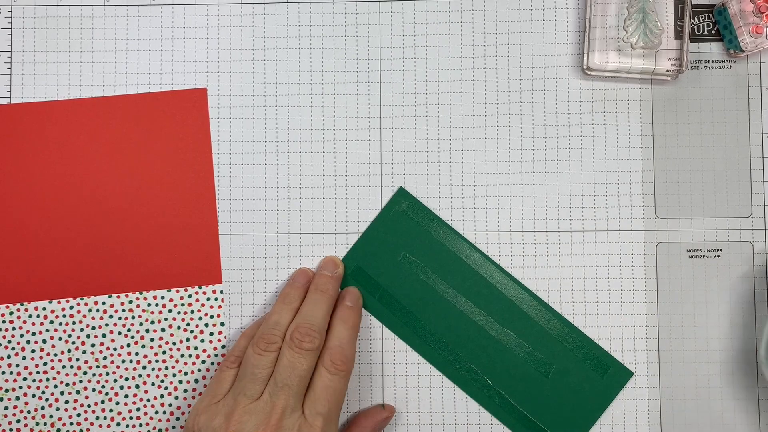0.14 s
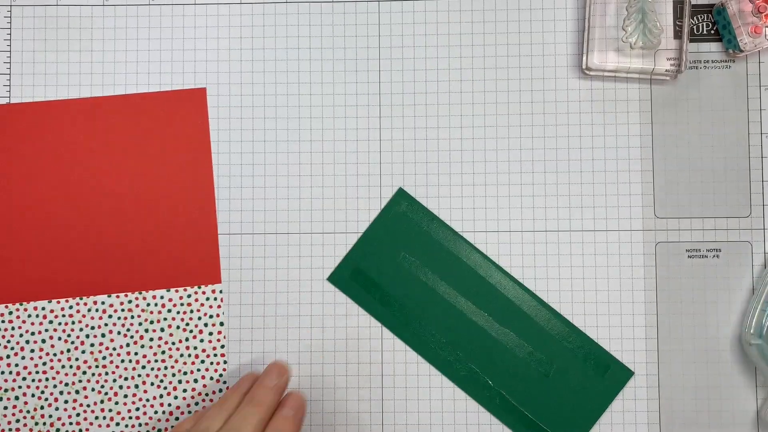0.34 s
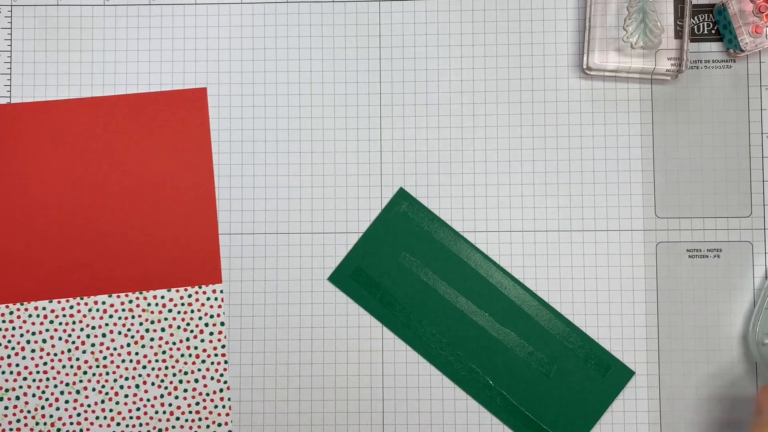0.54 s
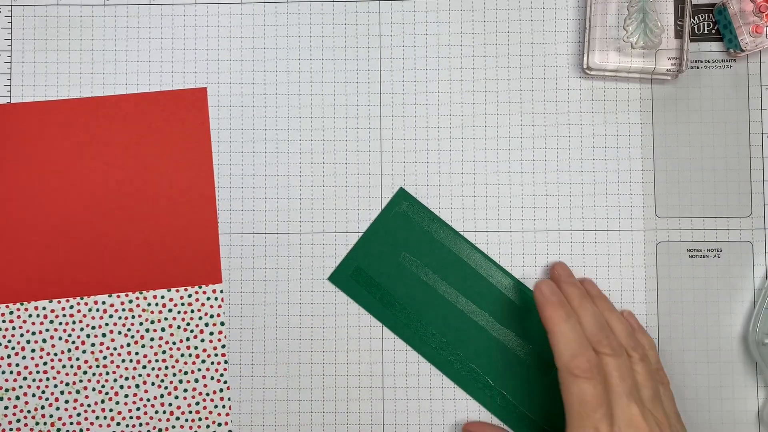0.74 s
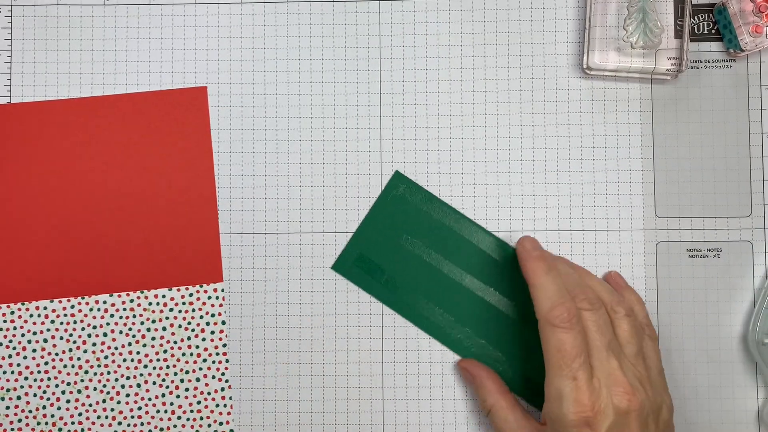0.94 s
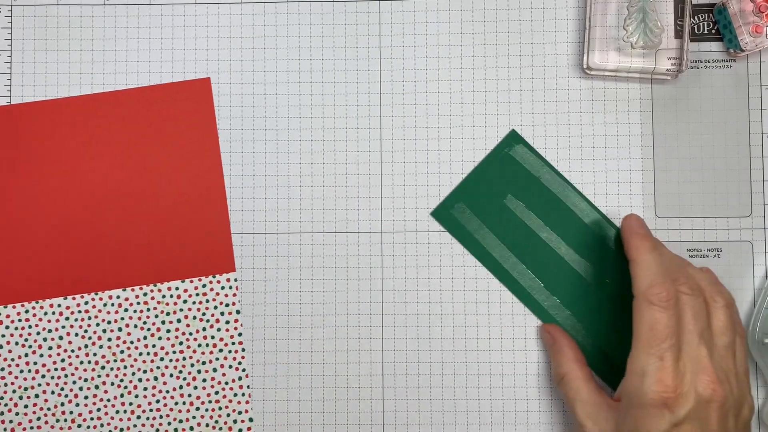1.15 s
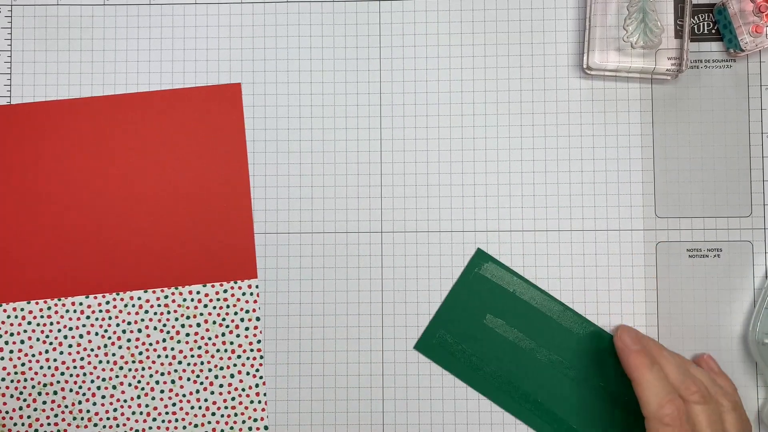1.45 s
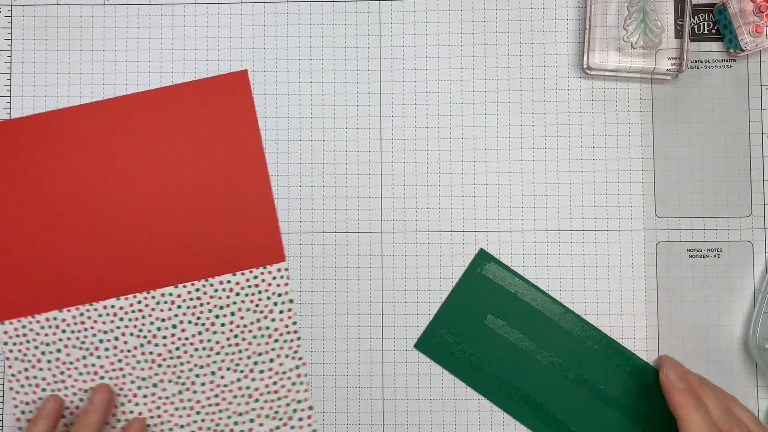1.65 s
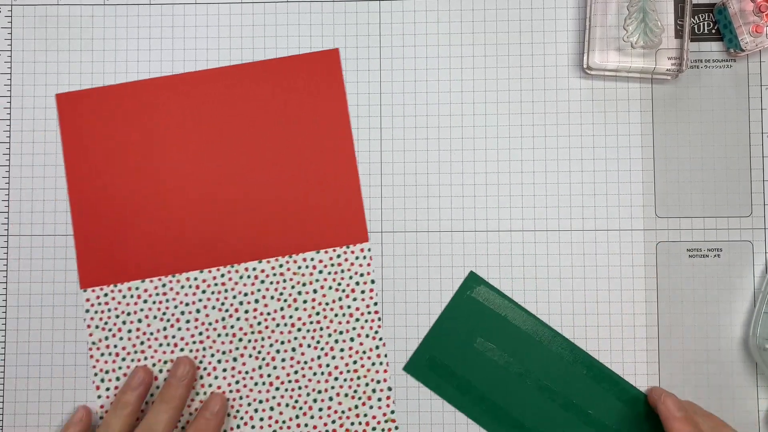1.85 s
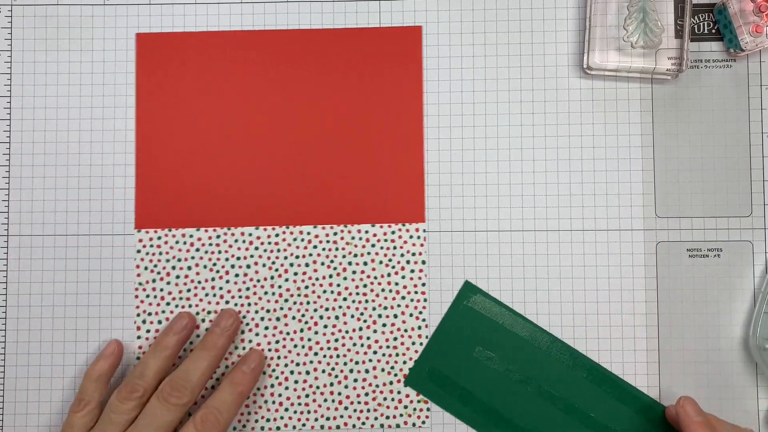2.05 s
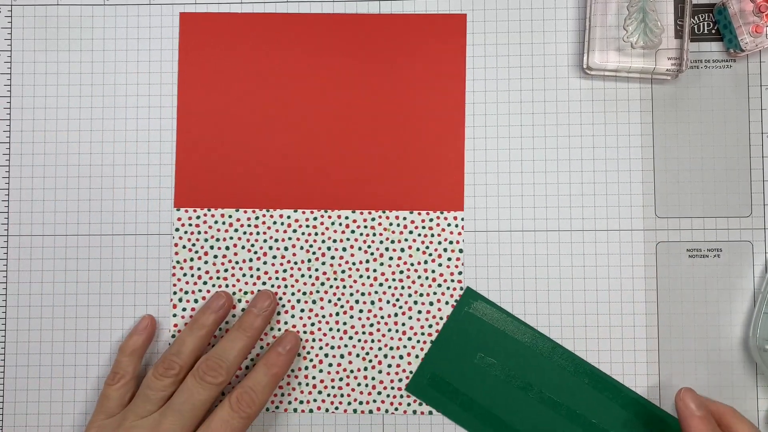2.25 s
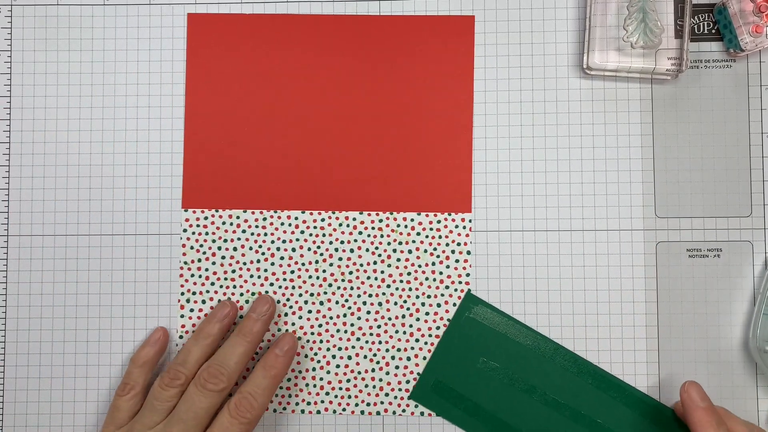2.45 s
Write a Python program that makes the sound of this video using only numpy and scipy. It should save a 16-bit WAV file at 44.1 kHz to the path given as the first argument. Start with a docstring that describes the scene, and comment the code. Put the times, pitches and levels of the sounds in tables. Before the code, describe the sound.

A plastic tape runner clatters onto a desk at about 0.2 and 0.4 seconds, slightly right, rattling over dull thuds and settling by 0.5. From 0.8 seconds, fingers pat softly and card brushes over a paper mat. Card edges snap crisply near 1.3 and 1.6 seconds. A longer, hissing slide follows until about 2.2, then faint rubs and a soft bump over low room tone.

```python
"""A plastic tape runner is put down on a craft desk and rattles to rest: each contact rings its shell
and shakes its loose parts, and the desk top thuds underneath. Then hands pat the desk and slide sheets
of card over a paper mat, a grainy hiss with a few crisp edge snaps. Behind it sit a faint rustle, low
room tone and a short reverb. In stereo the hits lean right, and everything arrives a little earlier
on the left."""
import sys
import numpy as np
from scipy import signal
from scipy.fft import rfft, irfft, next_fast_len
from scipy.io import wavfile
from scipy.ndimage import map_coordinates

SR = 44100
rng = np.random.default_rng(int(sys.argv[2]) if len(sys.argv) > 2 else 0)


def wrap_up_sound(samples):
    """Save the sound to the file named by the first command line argument, as 16-bit audio."""
    columns = np.atleast_2d(samples).T
    # keep every value between -1 and 1, then stretch to whole-number steps
    tamed = np.clip(columns, -1, 1)
    steps = np.round(tamed * 32767).astype(np.int16)
    wavfile.write(sys.argv[1], SR, steps)


N = 114660
SCENE_T = np.arange(N) / SR
HIT_T = np.arange(SR // 2) / SR  # seconds since a hit


def amp(db):
    """Decibels to gain."""
    return 10 ** (np.asarray(db) / 20)


def decay(t60):
    """A hit's envelope, falling 60 dB in t60 seconds."""
    return amp(-60 * HIT_T / t60)


def rise(attack_s):
    """A hit's attack, easing from 0 towards 1."""
    return 1 - np.exp(-HIT_T / attack_s)


def unit(x):
    """Scale to rms 1."""
    return x / np.sqrt(np.mean(x ** 2) + 1e-20)


def along(points, hz):
    """Read a curve of (freq_hz, value) points on a log frequency axis."""
    freqs, values = np.transpose(points)
    return np.interp(np.log(hz + 1), np.log(freqs + 1), values)


def filtered(x, response):
    """Filter x by a complex response, given as a function of frequency."""
    n = x.shape[-1]
    padded = next_fast_len(n + 8192)
    return irfft(rfft(x, padded) * response(np.fft.rfftfreq(padded, 1 / SR)), padded)[..., :n]


def noise(eq, size=len(HIT_T)):
    """Noise of rms 1, coloured by (freq_hz, gain_db) points; one hit long by default."""
    return unit(filtered(rng.standard_normal(size), lambda hz: amp(along(eq, hz))))


def wobble(rate_hz):
    """A smooth random curve with rate_hz knots a second."""
    knots = rng.standard_normal(int(N * rate_hz / SR) + 4)
    return map_coordinates(knots, [SCENE_T * rate_hz])


def ring(modes, attack_s, scatter_db):
    """Struck modes: damped sines whose levels vary from hit to hit by scatter_db."""
    partials = (amp(db + scatter_db * rng.standard_normal()) * decay(t60)
                * np.sin(2 * np.pi * hz * HIT_T) for hz, db, t60 in modes)
    return rise(attack_s) * sum(partials)


def place(track, start_s, sound):
    """Mix a sound into the track at start_s."""
    span = track[round(start_s * SR):][:len(sound)]
    span += sound[:len(span)]


def room_tone():
    """A low, gently wavering rumble, slightly different on each side."""
    eq = [(20, 5), (60, 4), (100, -0.5), (200, 0), (400, -15), (800, -29.5), (2000, -33), (16000, -63)]  # rumble colour: freq_hz, gain_db
    level = amp(-69 + 1.5 * wobble(11))
    return level * (noise(eq, N) + 0.24 * np.array([noise(eq, N), noise(eq, N)]))


def reverb(x):
    """The room's tail, longest in the bass: a centre layer plus a darker, diffuse one on each side."""
    decay_times = [(200, 0.64), (1000, 0.12), (4000, 0.15), (12000, 0.067)]  # room decay: freq_hz, t60_s
    hz, t, spectra = signal.stft(rng.standard_normal((3, SR // 3)), SR, nperseg=256)
    tails = signal.istft(spectra * amp(-60 * t / along(decay_times, hz)[:, None]), SR, nperseg=256)[1]
    tails /= np.linalg.norm(tails[0])
    predelayed = np.pad(x, (200, 0))
    centre, *sides = signal.fftconvolve(predelayed[None], tails, axes=1)[:, :N]
    diffuse = filtered(np.array(sides), lambda f: 1 / (1 + (f / 3000) ** 4))
    return amp(-10) * centre + amp(-3.5) * diffuse


def rustle(centre_hz=1800, width_hz=210):
    """A faint, narrow band of noise that swells twice and flutters."""
    fader = [(.56, -90), (.62, -64.5), (.68, -73.5), (0.759, -65.5), (.9, -75), (1.0, -88)]  # rustle envelope: time_s, level_db
    time_s, level_db = np.transpose(fader)
    band = filtered(rng.standard_normal(N), lambda hz: np.exp(-((hz - centre_hz) / width_hz) ** 2))
    return amp(np.interp(SCENE_T, time_s, level_db) + 2 * wobble(36)) * unit(band)


def card_slides():
    """Card rubbing on paper: a fine hiss and a duller scrape, grainy with the fibres."""
    strokes = [(0, -73, -63.5), (.055, -71.5, -74), (.075, -55.5, -59.5), (0.108, -49.5, -61),
               (.15, -68, -73.5), (.2, -67.5, -67), (.33, -69.5, -71.5), (0.382, -62.5, -59.5),
               (.52, -75, -79), (0.579, -75, -77.5), (.7, -78.5, -75.5), (0.762, -74.5, -72.5),
               (0.801, -55, -55.5), (0.849, -64.5, -63.5), (.9, -60.5, -57), (1.0, -52.5, -57),
               (1.04, -53.5, -60), (1.109, -48.5, -60), (1.15, -50, -59.5), (1.2, -61, -56.5),
               (1.25, -57.5, -62), (1.31, -51, -61), (1.412, -52, -65.5), (1.46, -65.5, -83.5),
               (1.489, -73, -86.5), (1.52, -64.5, -75), (1.55, -66.5, -79), (1.6, -70.5, -68.5),
               (1.625, -49.5, -66.5), (1.719, -41.5, -59), (1.78, -43, -63), (1.9, -42, -62),
               (2.01, -44, -61), (2.05, -43, -57.5), (2.17, -43, -62), (2.23, -57.5, -69),
               (2.281, -55.5, -66), (2.35, -69, -67.5), (2.39, -67, -62), (2.47, -68.5, -76),
               (2.5, -70.5, -60.5), (2.528, -72, -60), (2.56, -79, -82.5), (2.6, -72, -83)]  # friction envelopes: time_s, hiss_db, scrape_db
    hiss_eq = [(1500, -70), (2500, -11.5), (4000, -1), (6000, 0.5), (9000, -1), (12000, 1.5), (13000, -0.5),
               (16000, -2)]  # bright friction: freq_hz, gain_db
    scrape_eq = [(300, -22), (800, -15.5), (1100, -1.5), (1600, 1.5), (2000, -3.5), (2500, -9.5),
                 (4000, -4), (6000, -40)]  # dull friction: freq_hz, gain_db
    time_s, hiss_db, scrape_db = np.transpose(strokes)
    grain_db = 0.73 * wobble(150) + 0.99 * wobble(30.4)
    hiss = amp(np.interp(SCENE_T, time_s, hiss_db) + grain_db) * noise(hiss_eq, N)
    scrape = amp(np.interp(SCENE_T, time_s, scrape_db) + 1.8 * wobble(60)) * noise(scrape_eq, N)
    return hiss + scrape


def card_snaps():
    """Card edges snap free or touch down: a treble tick with a short crinkle behind it."""
    snaps = [(.021, -52), (.066, -40), (.071, -44), (.798, -46), (1.314, -42), (1.317, -38), (1.3202, -28),
             (1.3246, -28), (1.609, -34), (1.612, -44)]  # edge ticks: start_s, level_db
    # tick colour: freq_hz, gain_db
    eq = [(800, -10), (1500, -19.5), (3000, -4.5), (5000, 5.5), (7000, -0.5), (9000, -1.5),
          (16000, -6.5)]
    envelope = decay(0.007) + 0.33 * decay(0.04)
    track = np.zeros(N)
    for start_s, level_db in snaps:
        place(track, start_s, noise(eq) * amp(level_db - 5.5) * envelope)
    return track


def finger_pats(attack_s=0.003):
    """Fingers land on card over the mat: a short hollow knock and a puff of noise."""
    pats = [(0.075, -54, 520, -8), (.780, -45.5, 551, -2), (.80, -47, 1700, 3), (.888, -38.5, 556, -5),
            (0.891, -46.5, 1320, -3), (.938, -44.5, 1224, -7.5), (.981, -45, 510, -11),
            (.982, -43.5, 1240, -7), (1.158, -54.5, 540, 4), (1.1949, -38.5, 1290, -14),
            (1.326, -50, 1400, -1.5), (1.61, -61, 870, 2), (2.035, -57, 550, -3),
            (2.044, -52.5, 1110, -4.5)]  # finger contacts: start_s, level_db, pitch_hz, puff_db
    puff_eq = [(200, 19), (500, -8.5), (800, 4), (1300, -4), (2000, -4.5), (3000, -60), (8000, -36),
               (16000, -25)]  # puff colour: freq_hz, gain_db
    track = np.zeros(N)
    for start_s, level_db, pitch_hz, puff_db in pats:
        knock = 2 * ring([(pitch_hz, 0, 0.035)], attack_s, scatter_db=0.64)
        puff = amp(puff_db) * rise(attack_s) * decay(0.08) * noise(puff_eq)
        place(track, start_s, amp(level_db) * (knock + puff))
    return track


def desk_thuds(t60_cycles=8.43, attack_cycles=0.49):
    """Each blow pushes the desk top down: a low thud under two groups of ringing modes."""
    blows = [(.004, 83, -48.5, -54, -57), (.146, 108.5, -45.5, -52.5, -76),
             (0.2099, 245, -17, -30.5, -28.5), (0.2156, 203.4, -13, -25.5, -35.5),
             (0.2209, 190.7, -20.5, -40, -48), (0.2269, 66.8, -19, -36, -34), (.254, 78.5, -26.5, -53, -40),
             (.272, 78.5, -53, -30, -52), (0.4007, 386, -12.5, -20.5, -23), (0.4097, 235, -19, -30, -27.5),
             (0.413, 66.1, -27.5, -29, -29.5), (.456, 82, -46, -30.5, -30), (.474, 79, -49, -45, -31.5),
             (.498, 118, -31, -35, -38), (.51, 107, -34.5, -38.5, -50), (0.786, 80, -76, -60, -46),
             (.808, 83.3, -34.5, -45.5, -60), (0.889, 87, -63, -43.5, -44.5), (0.941, 70, -43, -61, -54.5),
             (.98, 92.5, -50, -54.5, -54), (1.042, 69.8, -57.5, -59.5, -60), (1.199, 90, -70, -54.5, -51),
             (1.335, 75, -56, -53.5, -63.5), (1.621, 89.3, -34.5, -55, -61),
             (1.66, 86.2, -43.5, -60.5, -77), (1.84, 60.5, -59, -64.5, -81.5),
             (2.04, 69.1, -65, -60, -67.5), (2.34, 79.7, -41, -61.5, -71.5), (2.51, 88, -58.5, -55, -58.5)]  # blows to the desk: start_s, pitch_hz, thud_db, middle_db, upper_db
    middle_modes = [(66, -10, .2), (130, -10, .12), (172, 0, .12), (229, -1, .1), (280, -12, .06)]  # the desk's body: pitch_hz, level_db, t60_s
    upper_modes = [(368, 6, 0.044), (420, -1, 0.054), (457.3, -2.5, .05), (561.6, -10.5, 0.13)]  # the desk's knock: pitch_hz, level_db, t60_s
    track = np.zeros(N)
    for start_s, pitch_hz, thud_db, middle_db, upper_db in blows:
        thud_mode = (pitch_hz, thud_db + 5, t60_cycles / pitch_hz)
        thud = ring([thud_mode], attack_s=attack_cycles / pitch_hz, scatter_db=0)
        body = amp(middle_db + 1) * ring(middle_modes, attack_s=0.0025, scatter_db=0.97)
        knock = amp(upper_db - 2.5) * ring(upper_modes, attack_s=0.0015, scatter_db=1)
        place(track, start_s, -(thud + body + knock))
    return track


def tape_runner():
    """Each contact with the desk rings the plastic shell, gives a sharp crack and shakes loose parts."""
    taps = [(.199, -25, 0.5), (0.21, -39.5, 5.5), (.221, -27, -4), (.229, -38.5, 5.5), (.236, -41.5, 5.5),
            (0.302, -47.5, -3.5), (0.3993, -19, 2), (.413, -20, 3.5), (0.42, -31.5, 5),
            (.456, -29.5, -11.5), (.475, -40.5, -4.5), (.484, -38.5, -7.5), (.5, -44, -10)]  # casing contacts: start_s, level_db, brightness_db
    shell_modes = [(660, -5, .04), (863, -12, 0.054), (1057, -8.5, 0.043), (1217, 8, 0.021),
                   (1380, 4, 0.02), (1462, -2.5, 0.038), (1685, 0.5, 0.014), (1830, 2.5, 0.018),
                   (2940, -2, 0.01)]  # shell resonances: pitch_hz, level_db, t60_s
    rattle_eq = [(300, -20.5), (600, 1.5), (1300, -2), (2200, -1), (5000, -2), (8000, -13), (16000, -20)]  # loose parts inside: freq_hz, gain_db
    crack_eq = [(1500, -60), (3000, 8), (16000, -7)]  # contact transient: freq_hz, gain_db
    track = np.zeros(N)
    for start_s, level_db, brightness_db in taps:
        shell = ring(shell_modes, attack_s=0.00025, scatter_db=2)
        crack = amp(2) * decay(0.013) * noise(crack_eq)
        rattle = amp(-3.5) * rise(0.002) * decay(0.066) * noise(rattle_eq)
        place(track, start_s, amp(level_db - 10.5) * (shell + amp(brightness_db) * (crack + rattle)))
    return track


def scene():
    """Mix the hits to the right and the card in the centre, with reverb, over the room tone."""
    pan = [(60, -1), (200, -3), (700, -6), (2400, -4.5), (4400, -3.5)]  # balance of the hits: freq_hz, left_minus_right_db
    runner, fingers = tape_runner(), finger_pats()
    hits = runner + fingers + desk_thuds() + reverb(runner + 0.35 * fingers)
    hits = filtered(hits, lambda hz: amp(np.outer([0.5, -0.5], along(pan, hz))))
    card = card_slides() + card_snaps() + rustle()
    return hits + card + 0.57 * reverb(card) + room_tone()


def record(dry, low_cut_hz=41, top_hz=15750):
    """The final stage: the left leads in phase, more so as frequency rises, deep bass rolls off and the very
    top is cut."""
    phase_lead = [(0, 0), (300, .1), (1800, .6), (3000, 1.2), (4650, 3.14), (6850, 6.28), (17450, 21.95)]  # how far the left is ahead: freq_hz, lead_rad
    freq_hz, lead_rad = np.transpose(phase_lead)

    def response(hz):
        phase = np.outer([0.5, -0.5], np.interp(hz, freq_hz, lead_rad))
        low_cut = (1j * hz / (low_cut_hz + 1j * hz)) ** 2
        return np.exp(1j * phase) * low_cut * (hz < top_hz)

    return filtered(dry, response)


dry = scene()
out = record(dry)
wrap_up_sound(out)
```